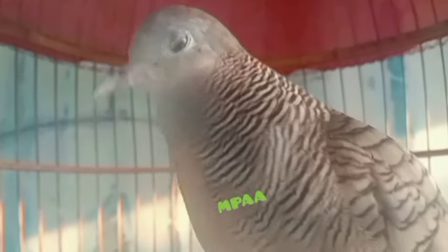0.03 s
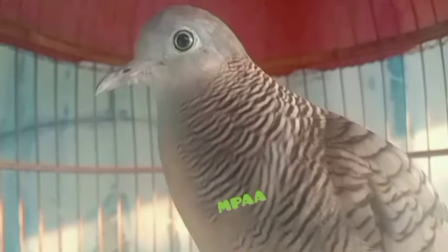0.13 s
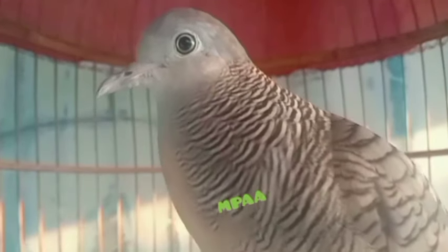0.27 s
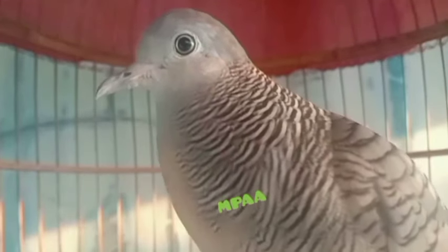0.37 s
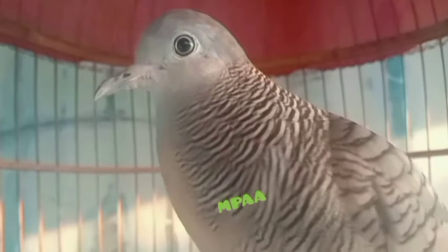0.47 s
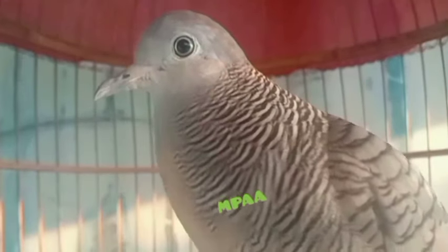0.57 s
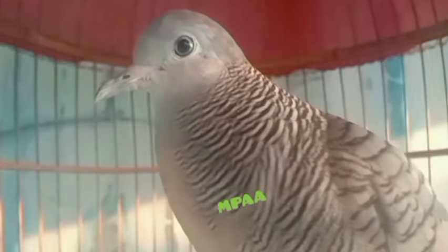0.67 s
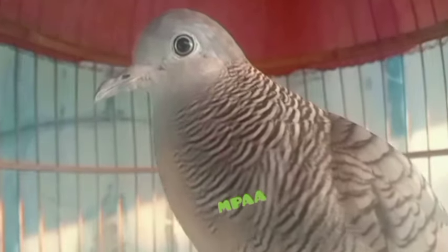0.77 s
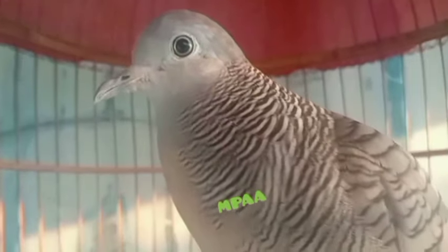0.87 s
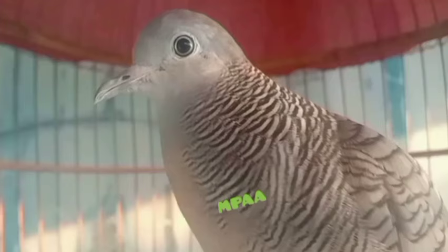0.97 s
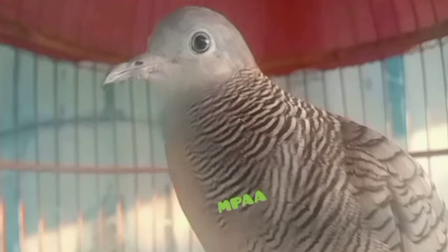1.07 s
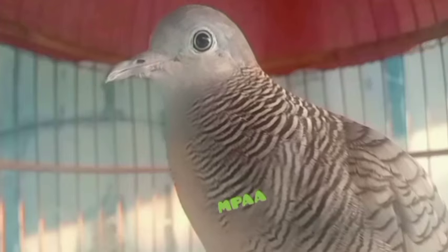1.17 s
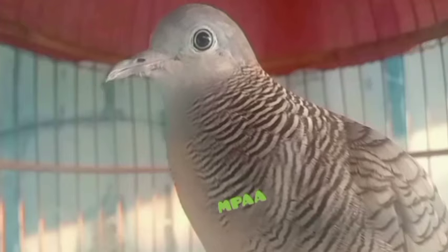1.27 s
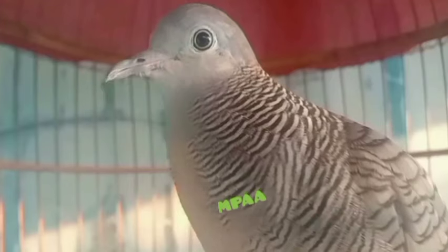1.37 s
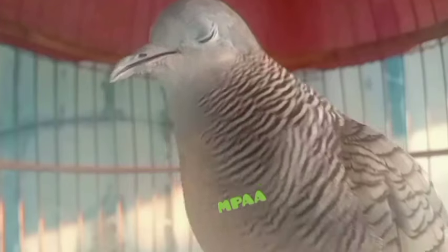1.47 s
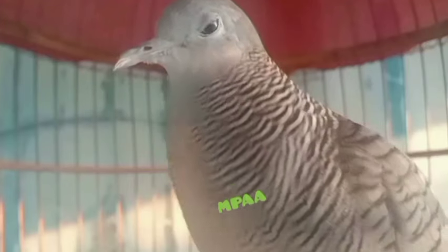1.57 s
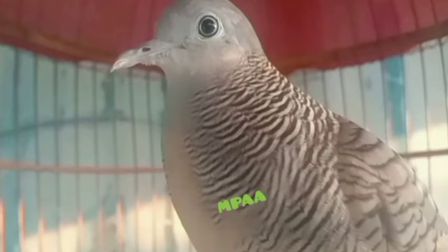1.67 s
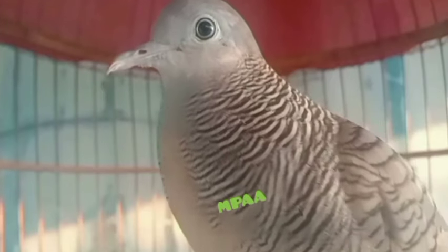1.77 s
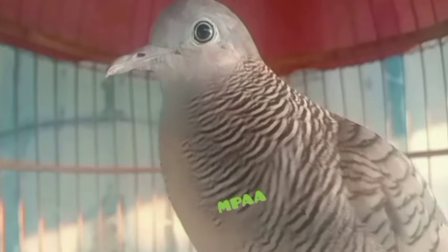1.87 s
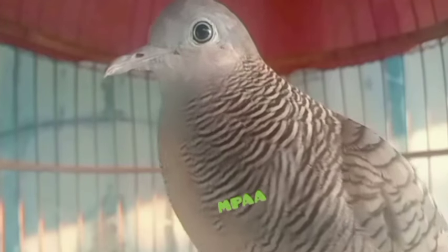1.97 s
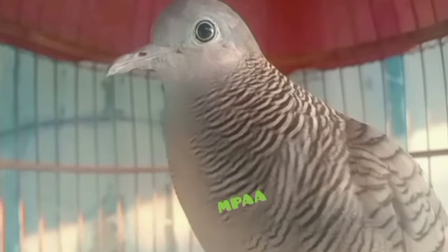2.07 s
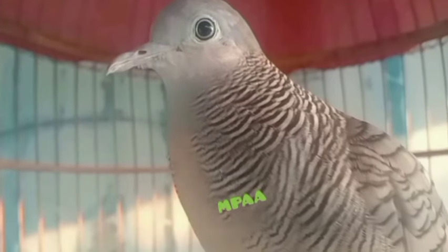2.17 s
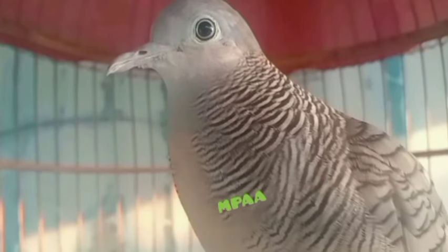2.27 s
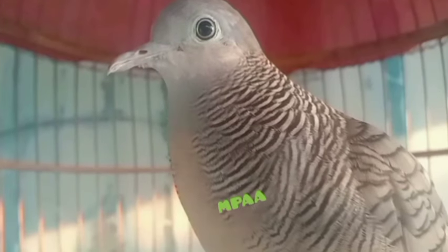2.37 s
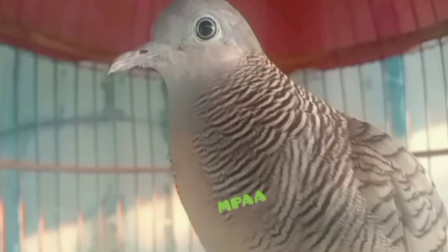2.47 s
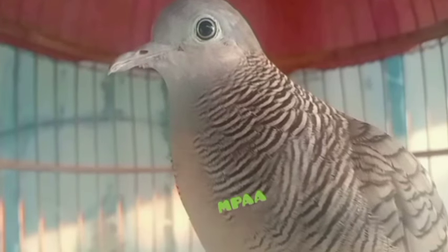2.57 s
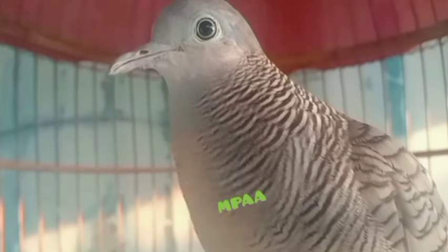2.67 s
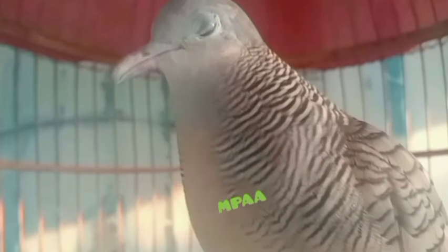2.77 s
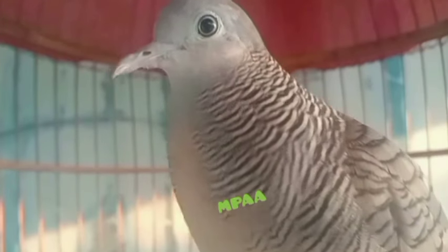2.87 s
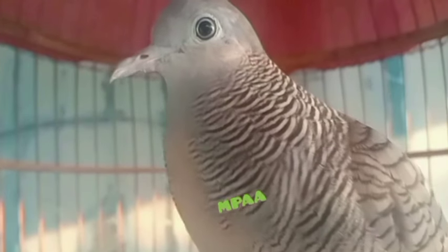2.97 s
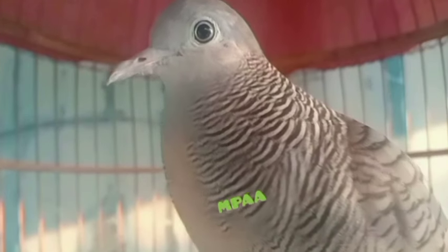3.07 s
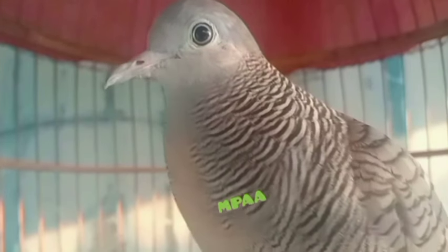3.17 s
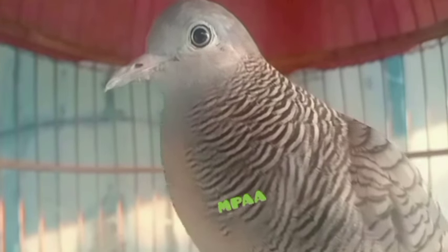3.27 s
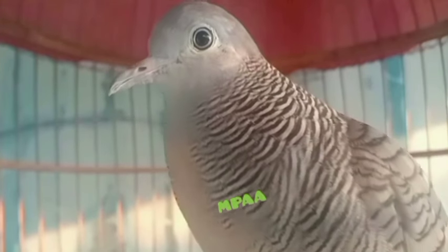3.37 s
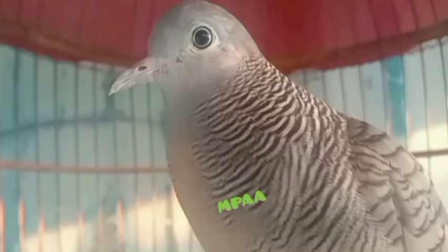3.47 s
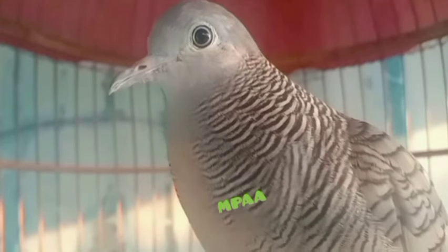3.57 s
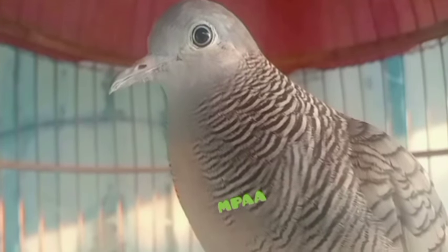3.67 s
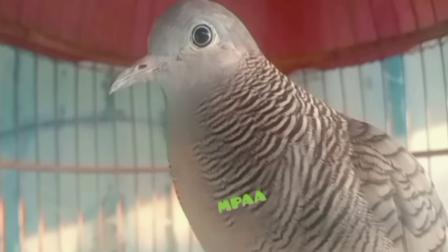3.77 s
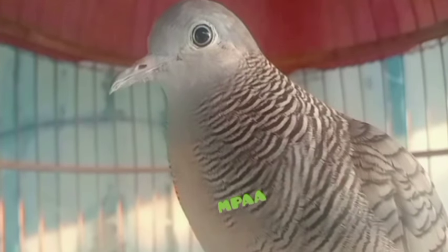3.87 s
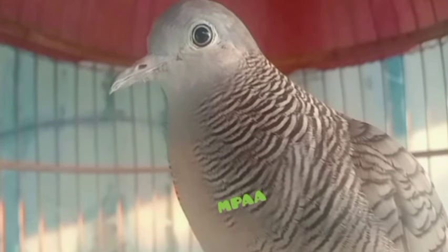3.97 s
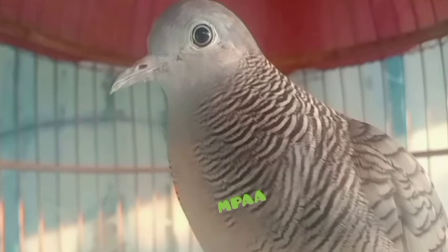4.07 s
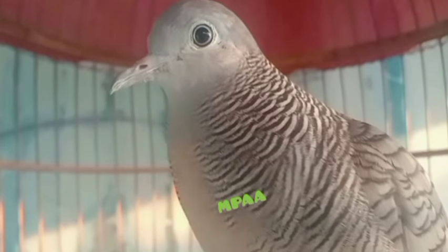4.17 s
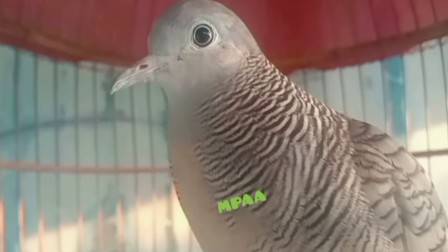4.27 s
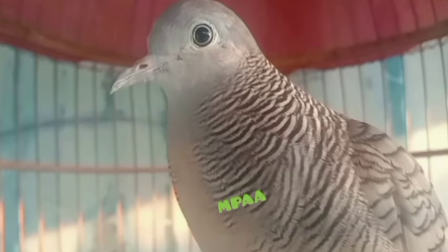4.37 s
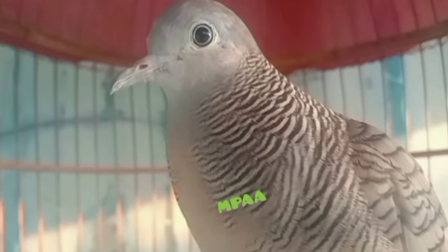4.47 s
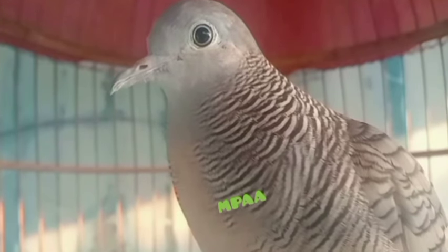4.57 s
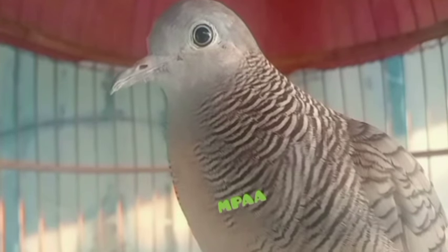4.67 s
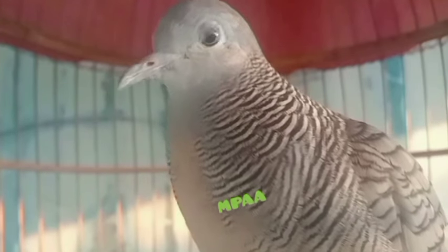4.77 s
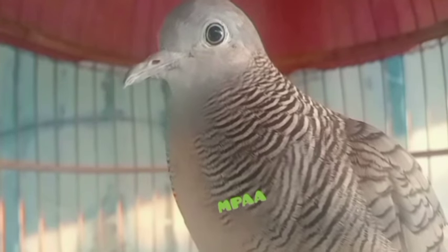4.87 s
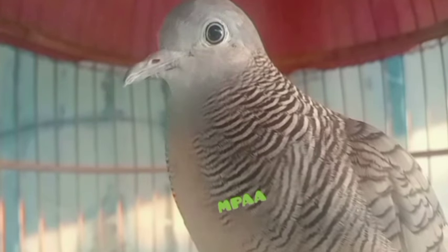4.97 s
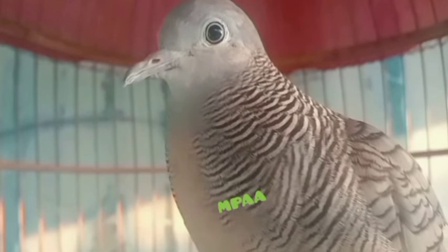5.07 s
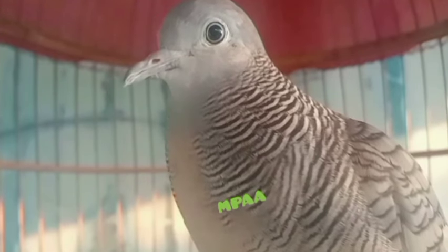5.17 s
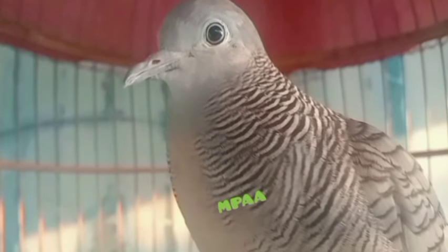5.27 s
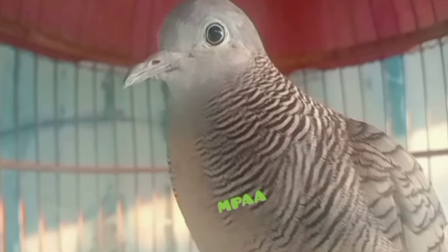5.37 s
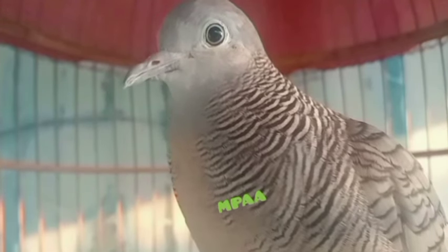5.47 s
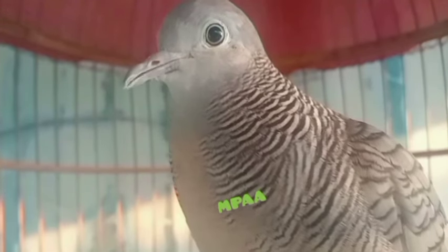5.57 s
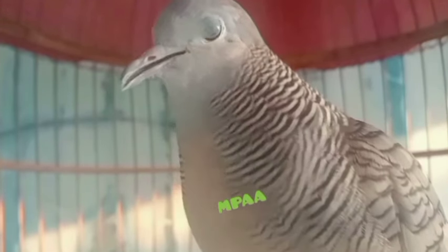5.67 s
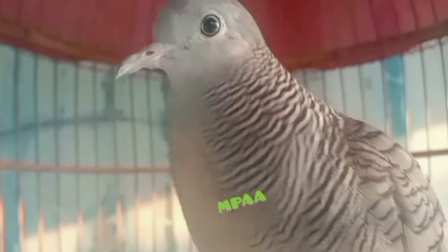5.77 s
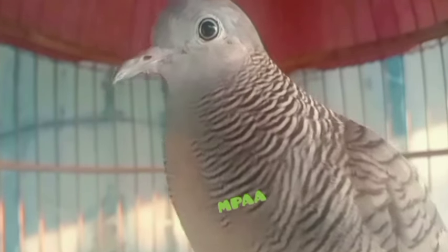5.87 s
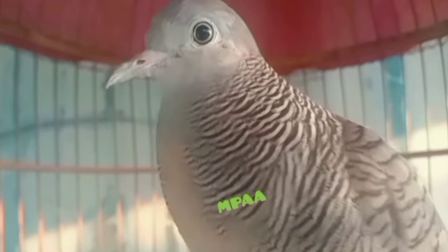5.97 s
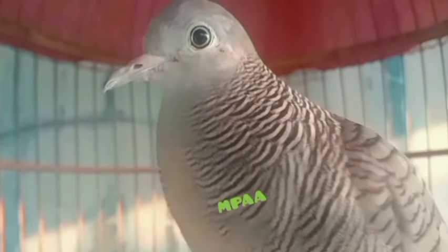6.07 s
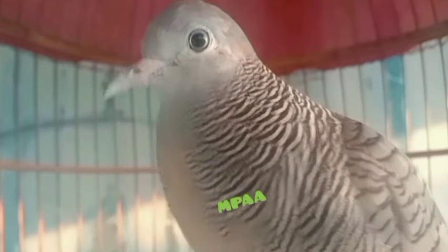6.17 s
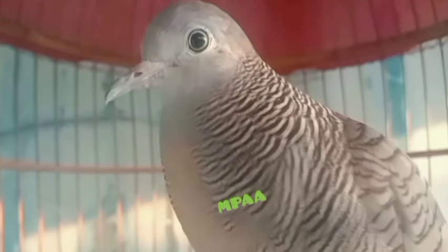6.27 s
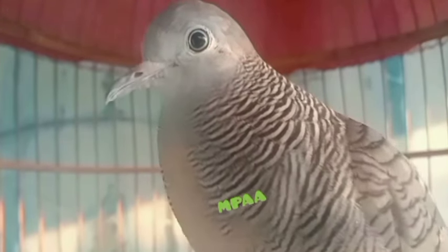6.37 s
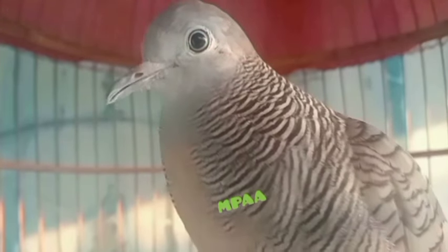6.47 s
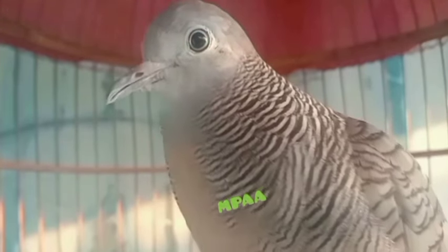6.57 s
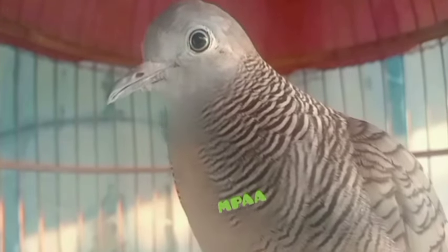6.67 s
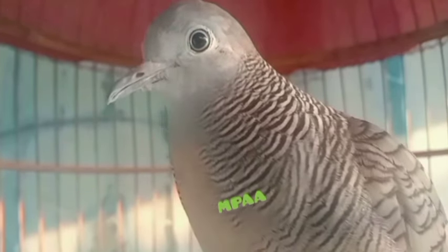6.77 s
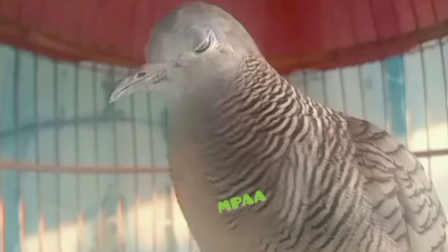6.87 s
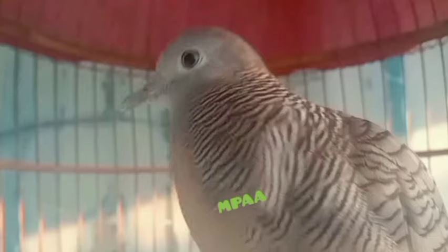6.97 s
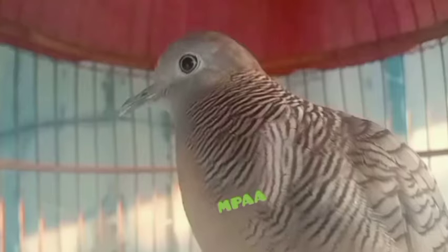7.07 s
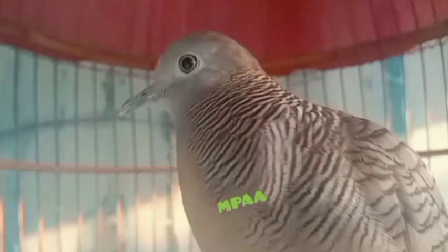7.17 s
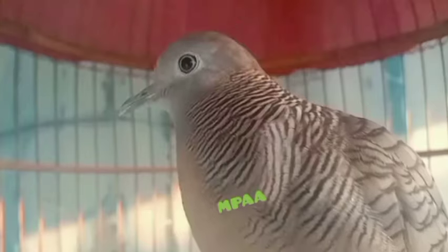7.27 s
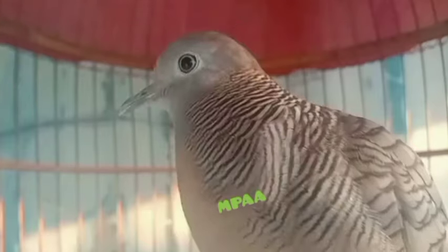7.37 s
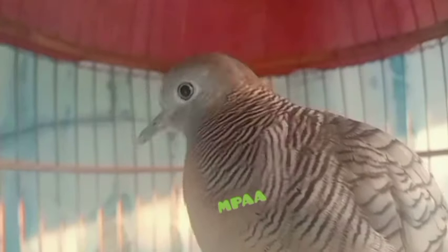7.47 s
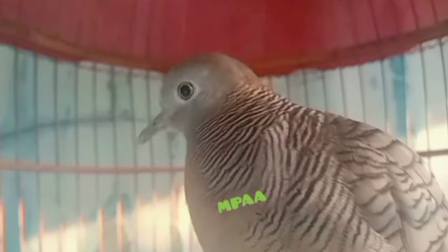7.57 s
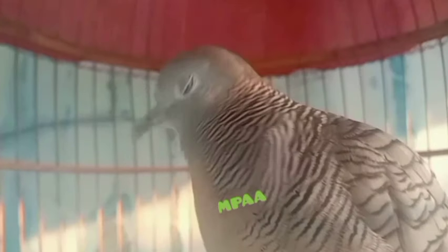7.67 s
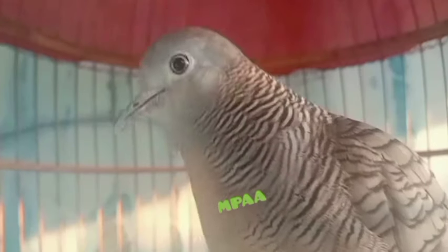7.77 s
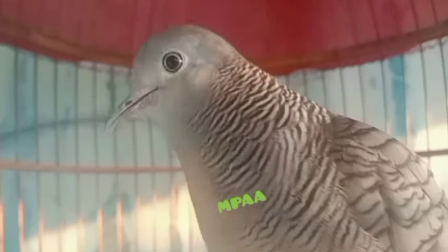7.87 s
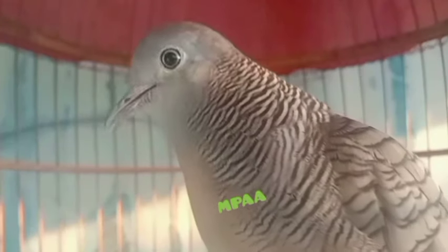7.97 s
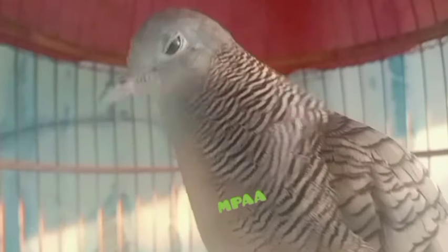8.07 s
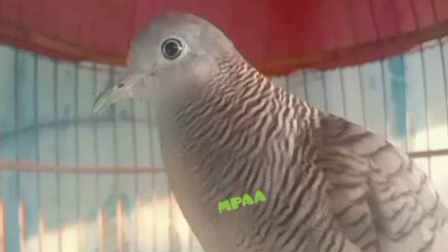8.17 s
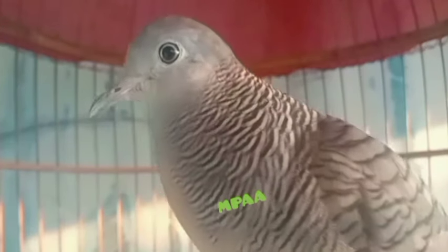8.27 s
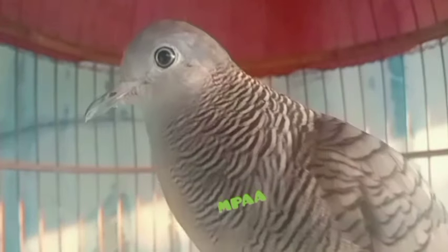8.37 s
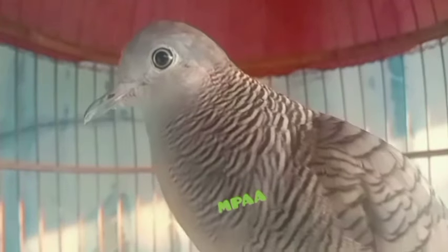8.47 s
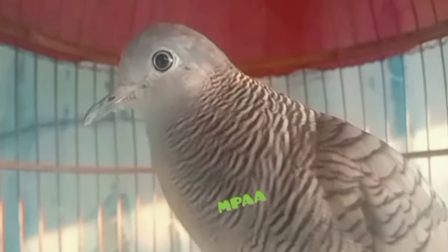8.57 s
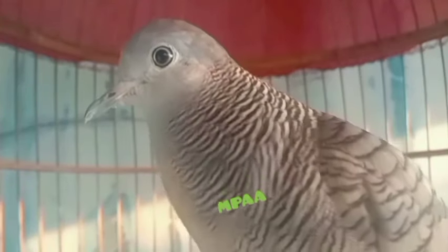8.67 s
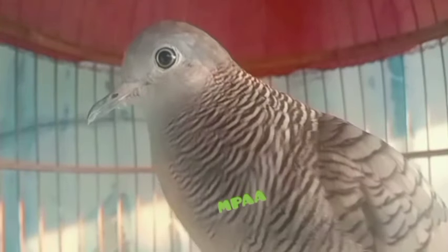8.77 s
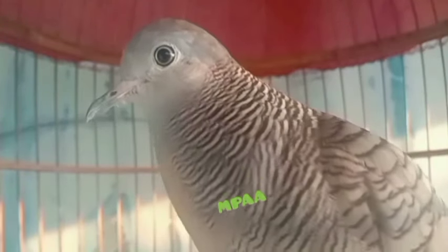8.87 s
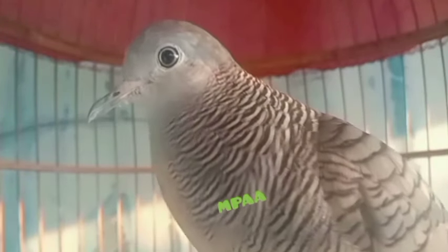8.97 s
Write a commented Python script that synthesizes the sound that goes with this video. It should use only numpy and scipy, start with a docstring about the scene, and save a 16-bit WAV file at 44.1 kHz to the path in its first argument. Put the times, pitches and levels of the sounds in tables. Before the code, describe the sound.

A caged zebra dove coos five loud, rippling phrases close up under a hard echoing roof, with faint far doves and small birds between.

```python
"""Under a hard, echoing roof, a caged zebra dove coos five rippling phrases close to a microphone.
Each coo is a gliding, nearly pure tone with faint overtones; most begin with a creak of quick pops.
Far doves answer in blurred, arched notes; small birds sing fuzzy glides, thin whistles and harsh chirps.
A brief rustle and a quiet outdoor hush are shaped noise. A limiter and a hard ceiling tame the peaks."""
import sys
import numpy as np
from scipy import signal
from scipy.fft import next_fast_len
from scipy.io import wavfile
from scipy.ndimage import uniform_filter1d

SR = 44100
rng = np.random.default_rng(int(sys.argv[2]) if len(sys.argv) > 2 else 0)


def to_wav(s):
    """Save 16-bit WAV."""
    ch = np.atleast_2d(s).T  # columns
    pcm = np.round(np.clip(ch, -1, 1) * 32767)  # PCM
    wavfile.write(sys.argv[1], SR, pcm.astype(np.int16))


N = 398223


def gain_of(db):
    """Turns decibels into a multiplier."""
    return 10 ** (np.asarray(db) / 20)


def evened(x):
    """Scales a sound to an average (RMS) strength of 1."""
    return x / np.sqrt(np.mean(x ** 2) + 1e-20)


def read(points, hz):
    """Reads a frequency curve between its points, on a logarithmic pitch scale."""
    f, value = np.transpose(points)
    return np.interp(np.log(hz + 1), np.log(f + 1), value)


def add(mix, s, sound):
    """Lays a sound into the mix, starting s seconds in."""
    part = mix[max(round(s * SR), 0):][:len(sound)]
    part += sound[:len(part)]


def fade(count, rise, fall):
    """Smooth rise and fall, in seconds."""
    edge = np.arange(count) / SR
    nearest_end = np.minimum(edge / rise, edge[::-1] / fall)
    return np.sin(np.pi / 2 * np.clip(nearest_end, 0, 1)) ** 2


def resonate(x, hz, width):
    """Shifts the pitch hz down to zero, smooths, and shifts back: a resonance of gain 1."""
    turn = np.exp(2j * np.pi * np.cumsum(hz * np.ones(len(x))) / SR)
    r = np.exp(-np.pi * width / SR)
    smooth = signal.lfilter([1 - r], [1, -r], x / turn)
    return 2 * (turn * smooth).real


def noise(colour, patchy_db, count):
    """Builds hiss from random short-time spectra with drifting louder and softer patches."""
    hz = np.fft.rfftfreq(1024, 1 / SR)
    a, b, patches = rng.standard_normal((count // 256 + 5, 513, 3)).T
    patches = uniform_filter1d(patches, size=3, axis=0)  # across frequency
    patches = evened(uniform_filter1d(patches, size=24, axis=1))  # along time
    spectra = (a + 1j * b) * gain_of(read(colour, hz)[:, None] + patchy_db * patches)
    return evened(signal.istft(spectra, nperseg=1024, noverlap=768)[1][:count])


# The close dove's coos, one list a phrase:
# (time [s], length [s], aim pitch [Hz], sag [Hz], level before the mix [dB])
COOS = [
    [(0.0544, 0.1145, 1314, 25, -4.6), (0.1804, 0.0375, 1305, 50, -4), (0.2497, 0.034, 1306, 97, -4),
     (0.332, 0.045, 1340, 135, -5.3), (0.4329, 0.0965, 1316, 115, -3.6), (0.6186, 0.12, 1298, 78, -3.8)],
    [(1.544, 0.124, 1312, 25, -4.6), (1.6817, 0.0346, 1325, 65, -1.8), (1.7462, 0.0292, 1295, 75, -3.6),
     (1.8157, 0.0289, 1318, 90, -3.4), (1.8962, 0.0955, 1296, 92, -3.7)],
    [(2.7825, 0.101, 1308, 15, -4.4), (2.8858, 0.0434, 1325, 60, -4.2), (2.9422, 0.0309, 1300, 65, -4.8),
     (3.004, 0.0325, 1280, 55, -4.1), (3.0847, 0.0319, 1315, 85, -3.3), (3.174, 0.1015, 1303, 125, -4.3)],
    [(5.7281, 0.1415, 1320, 30, -4.3), (5.8711, 0.04, 1305, 45, -3.6), (5.937, 0.0261, 1280, 60, -2.6),
     (6.0099, 0.0315, 1292, 78, -3), (6.0898, 0.0469, 1320, 130, -3.1), (6.2263, 0.1384, 1312, 140, -3.2)],
    [(8.0901, 0.082, 1356, 5, -2.2), (8.1734, 0.0414, 1345, 15, -4.8), (8.2352, 0.0215, 1290, 5, -2.4),
     (8.2872, 0.0257, 1290, 45, -2.1), (8.3572, 0.0306, 1345, 140, -2.8), (8.4382, 0.0952, 1342, 135, -3.9),
     (8.6323, 0.1076, 1366, 145, -4.2), (8.8405, 0.1197, 1362, 138, -4.5)],
]
# How a coo moves, by its place in the phrase:
# (leap [Hz], base rise time [s], last drop [Hz], swell [dB], creak lead [s], creak length [s],
#  creak level before CREAK_DB [dB])
FIRST_COO = (330, .0055, 50, -.5, .02, .019, 6.5)
TIED_COO = (235, .013, 100, 1.5, .012, .012, -60)
LATER_COO = (235, .008, 100, -3.5, .012, .013, 1.5)
# Moments when the pitch of a long first coo slips: (time [s], length [s], depth [Hz])
SLIPS = [(0.115, .032, 75), (1.63, .024, 70), (2.838, .026, 45), (5.82, .026, 35)]
# Moments when the coo sounds louder: (time [s], length [s], extra level [dB])
LOUDER_MOMENTS = [(0.128, .024, 2.5), (5.835, .035, 1.6), (8.195, .02, 1.5), (8.495, .03, 1.6)]
RISE_SHARE, DROP_SHARE = .03, .04  # longer coos rise and drop more slowly (share of the length)
SAG_POWER = 2.3


def dove():
    """Each coo leaps up to its aim, sags slowly and drops as it stops; tied coos have almost no creak."""
    out = np.zeros(N)
    for phrase in COOS:
        manners = [FIRST_COO, TIED_COO] + [LATER_COO] * len(phrase)
        for (s, length, aim_hz, sag_hz, db), manner in zip(phrase, manners):
            leap_hz, rise, drop_hz, swell_db, lead, creak_s, creak_db = manner
            t = np.arange(-.003, length + .003, 1 / SR)
            hz = aim_hz - leap_hz * np.exp(-t / (rise + RISE_SHARE * length))
            hz -= sag_hz * np.abs(t / length) ** SAG_POWER
            hz -= drop_hz * np.exp((t - length) / (.003 + DROP_SHARE * length))
            for at, span, depth_hz in SLIPS:
                progress = np.clip((s + t - at) / span, 0, 1)
                hz -= depth_hz * np.sin(np.pi * progress ** .7)
            level_db = db + swell_db * (t / length - .5)
            for at, span, extra_db in LOUDER_MOMENTS:
                progress = np.clip((s + t - at) / span, 0, 1)
                level_db += extra_db * np.sin(np.pi * progress) ** 2
            add(out, s + t[0], voice(hz, level_db))
            add(out, s - lead, creak(creak_s, creak_db))
    return out + clucks()


# Base level of the second to twelfth partial, beside the main tone: (level [dB])
OVERTONES = [-29.5, -37.5, -38.5, -44.5, -41.5, -50, -58, -55, -60.5, -58, -69]
# How the throat colours the overtones: (frequency [Hz], level [dB])
THROAT = [(2000, 2.5), (2500, -2.5), (3300, -6), (5000, -0.5), (6000, -2.5), (7600, 2), (9000, -2),
          (15000, -6)]
TONE_RISE_S, TONE_FALL_S, LEAK_RISE_S, LEAK_FALL_S = .007, .006, .021, .008
GLIDE_LOSS_DB = .0009  # overtones from the third partial up weaken while the pitch moves (dB per Hz/s)


def voice(hz, db):
    """The inflated throat passes a near sine; weak, unsteady overtones leak through more slowly."""
    turns = 2 * np.pi * (np.cumsum(hz) / SR + rng.random())
    t = np.arange(len(hz)) / SR
    waver = np.sin(t * rng.uniform(56, 160, (11, 1)) + 2 * np.pi * rng.random((11, 1)))
    loss_db = GLIDE_LOSS_DB * uniform_filter1d(np.abs(np.gradient(hz)) * SR, size=200)
    weak = np.zeros(len(hz))
    for k, base_db in enumerate(OVERTONES):
        partial = k + 2
        partial_db = base_db + read(THROAT, partial * hz) + 8.0 * waver[k] - (k > 0) * loss_db
        weak += gain_of(partial_db) * np.sin(partial * turns)
    tone = np.sin(turns) * fade(len(hz), TONE_RISE_S, TONE_FALL_S)
    leak = weak * fade(len(hz), LEAK_RISE_S, LEAK_FALL_S) ** 2
    return gain_of(db) * (tone + leak)


# How the throat rings under each pop: (frequency [Hz], level before the creak's own level [dB])
CREAK_RING = [(690, -16), (980, -4.5), (1500, -7)]
CREAK_DB, CREAK_HZ = -19, 300  # base level; pops per second at the start, half as many again at the end


def creak(length, db):
    """Before the tone locks in, the membranes pop a few times, generally louder and louder."""
    t = np.arange(0, length, 1 / SR)
    turns = np.cumsum(CREAK_HZ * (1 + .5 * t / length)) / SR + rng.random()
    starts = np.diff(turns // 1, prepend=0) > 0  # one pop at each whole turn
    pops = starts * gain_of(-17 * (1 - t / length) ** 4 + 2.6 * rng.standard_normal(len(t)))
    ring = sum(gain_of(d) * np.sin(2 * np.pi * f * t[:190]) for f, d in CREAK_RING)
    return gain_of(db + CREAK_DB) * np.convolve(pops, ring * np.hanning(190))


# A small cluck before each phrase: (time [s], starting level before its fade-in and the mix [dB])
CLUCKS = [(0.01, -26), (1.493, -16.5), (2.735, -22.5), (5.688, -20.5), (8.034, -22)]


def clucks():
    """Each cluck is a 1050 Hz tone that starts quickly and dies away."""
    out = np.zeros(N)
    t = np.arange(SR // 20) / SR
    tone = np.sin(2 * np.pi * 1050 * t) * np.minimum(t / 0.0036, 1)
    for s, db in CLUCKS:
        add(out, s, gain_of(db - 60 * t / 0.042) * tone)
    return out


# Echoes from roof, walls and floor: (delay [ms], gain before dulling [multiplier])
ECHOES = [(1.77, 0.24), (7.12, 0.46), (9.07, 0.29), (9.3, 0.22), (11.79, 0.123), (12.83, 0.092),
          (15.51, 0.055), (19.46, 0.214), (20.05, 0.028), (25.12, 0.15), (29.75, 0.12), (32.79, 0.22),
          (35.06, 0.16), (37.64, 0.078), (41.04, 0.063), (46.89, 0.15), (57.14, 0.024), (69.89, 0.093)]
ECHO_DULL_HZ = 5200


def shelter(x):
    """Adds single dull echoes from hard faces near the cage, strongest around the pitch of the coo."""
    taps = np.zeros(SR // 10)
    for ms, gain in ECHOES:
        taps[round(ms * SR / 1000)] += gain
    echoes = signal.fftconvolve(x, taps)[:N]
    echoes = signal.filtfilt(*signal.butter(2, ECHO_DULL_HZ, fs=SR), echoes)
    b, a = signal.butter(2, [820, 1480], "bandstop", fs=SR)
    off_pitch = signal.filtfilt(b, a, echoes)
    return x + echoes - .6 * off_pitch


# How long the late echo takes to fall by 60 dB: (frequency [Hz], time [s])
YARD = [(300, .4), (1200, 0.47), (3000, 0.31), (8000, 0.3)]


def yard(x):
    """Late echo: random taps, each frequency band dying at its own speed."""
    hz, t, z = signal.stft(rng.standard_normal(SR), SR, nperseg=256)
    dying = z * gain_of(-60 * t / read(YARD, hz)[:, None])
    tail = signal.istft(dying, SR, nperseg=256)[1]
    return signal.fftconvolve(x, tail / np.linalg.norm(tail))[:N]


# Far doves, one list an answer: (time [s], level before end fades [dB], pitch before note variation [Hz])
FAR_DOVES = [
    [(0.95, -66.5, 1150), (1.17, -60, 1050), (1.22, -44, 1060), (1.36, -37, 1200), (1.52, -38.5, 1150)],
    [(2.0, -33, 1150), (2.5, -43, 1170), (2.73, -47, 1220)],
    [(3.36, -46.5, 1240), (3.678, -68.5, 854), (3.8, -75, 1050)],
    [(5.05, -72, 1218), (5.36, -52, 1100), (5.71, -44, 1020)],
    [(6.4, -34, 1150), (6.7, -40, 1060), (7.038, -44, 1040), (7.3, -70, 1020)],
]


def far_doves():
    """Three birds sing arched notes of changing pitch, blurred by distance into a wavering band."""
    out = np.zeros(N)
    for rows in FAR_DOVES:
        s, db, hz = np.transpose(rows)
        t = np.arange(s[0], s[-1], 1 / SR)
        # 15 notes a second per bird, the birds out of step
        beat, note = np.modf((t - s[0]) * 15 + np.array([[0], [.3], [.6]]))
        pitch = rng.uniform(.84, 1.13, (40, 3))[note.astype(int), [[0], [1], [2]]]
        arch = 1.08 - .22 * np.exp(-beat / .2) - .16 * beat ** 2
        note_hz = np.interp(t, s, hz) * pitch * arch
        notes = np.sin(2 * np.pi * np.cumsum(note_hz, axis=1) / SR)
        notes *= np.sin(np.pi * np.minimum(beat / 0.88, 1))
        slow = signal.butter(4, 35, fs=SR, output="sos")
        flutter = signal.sosfiltfilt(slow, rng.standard_normal(len(t)))
        notes = notes.sum(axis=0) * (1 + .6 * evened(flutter))
        # play twice and keep the second pass, so the echo is already ringing at its start
        echo = yard(np.r_[notes, notes])[len(t):2 * len(t)]
        blurred = evened(evened(echo) + .4 * evened(notes))
        add(out, s[0], gain_of(np.interp(t, s, db)) * blurred * signal.windows.tukey(len(t), .1))
    return out


def far_birds():
    """Glides, whistles and harsh chirps, each heard with a softer late echo from the yard."""
    birds = glides() + whistles() + chirps()
    return birds + gain_of(-7) * yard(birds)


# Far bird tones: (time [s], length [s], from [Hz], to [Hz], level before fades and echo [dB], blur [Hz])
TONES = [(1.195, .05, 2280, 2400, -58, 40), (1.285, .07, 2340, 2490, -59, 40),
         (1.22, .1, 1340, 1400, -45, 30), (2.37, .1, 1290, 1290, -42, 20),
         (1.228, 0.0579, 1968, 1963, -57, 20), (0.87, .17, 890, 880, -59, 40),
         (2.2, .3, 1620, 1610, -62, 50), (2.27, .14, 1000, 1030, -42, 90),
         (2.47, 0.07, 850, 824.5, -55, 60), (2.59, .17, 4560, 4350, -54, 200),
         (2.44, .06, 3150, 3250, -63, 40), (2.655, .045, 2850, 2870, -57, 40),
         (2.54, 0.08, 3700, 4600, -50, 60), (2.546, 0.083, 3189, 3037, -54.5, 50),
         (2.564, 0.09, 3651, 3500, -54, 40), (2.57, 0.12, 1979, 1994, -56, 80),
         (2.58, 0.1278, 2590, 2488, -60, 50), (2.698, 0.09051, 3015, 3268, -50.5, 40),
         (2.75, .09, 330, 290, -49, 18), (2.86, .17, 320, 342, -47, 18), (2.998, 0.2, 396, 415, -50, 20),
         (3.3, 0.34097, 755, 770, -54.5, 40), (3.585, .06, 617, 610, -57, 10),
         (3.82, .05, 3600, 4300, -66, 500), (4.172, 0.09, 3600, 4400, -55, 70),
         (4.26, .13, 4400, 4350, -64, 60), (4.2, 0.38, 2010, 2030, -69, 80),
         (4.3, .26, 2200, 2720, -69, 120), (5.38, .32, 2780, 2790, -66, 30),
         (5.3, .38, 2000, 1950, -68, 80), (6.47, 0.04857, 614, 625, -45, 10),
         (6.652, 0.18, 3850, 3660, -52.5, 80), (6.655, 0.07, 610, 625, -48, 10),
         (6.875, .06, 570, 560, -52, 20), (6.87, .05, 727, 686.8, -51, 120),
         (7.325, 0.04, 1620, 1634, -54, 40), (7.31, .05, 1974, 2150, -57, 60),
         (7.5, 0.18, 430, 417, -59, 25), (7.82, 0.1, 320, 290, -60, 25), (7.77, .08, 880, 870, -62, 30),
         (8.72, .24, 400, 420, -53, 30), (7.96, .08, 930, 1080, -43, 90), (7.99, .1, 1290, 1400, -40, 60),
         (8.03, .06, 1000, 1050, -40, 120), (7.75, .06, 1560, 1580, -62, 60),
         (8.55, .08, 1380, 1420, -36, 60), (6.05, .06, 650, 640, -50, 40), (6.17, .05, 600, 610, -52, 40)]


def glides():
    """Noise rings in two narrow resonances that follow a gliding pitch."""
    out = np.zeros(N)
    for s, length, from_hz, to_hz, db, blur_hz in TONES:
        u = np.linspace(0, 1, round(length * SR))
        hz = from_hz + (to_hz - from_hz) * np.sin(u * np.pi / 2)
        fuzzy = resonate(rng.standard_normal(len(u)), hz, blur_hz)
        fuzzy = resonate(fuzzy, hz, 2 * blur_hz)
        add(out, s, gain_of(db) * evened(fuzzy) * signal.windows.tukey(len(u), .4))
    return out


# Thin whistles: (time [s], length [s], pitch before drift [Hz], level before flutter, fades and echo [dB],
#  octave below, beside the main tone [dB])
WHISTLES = [(0, 0.036, 4900, -50, -11.5), (2.245, 0.13, 4781, -53, -8), (2.945, 0.17, 4920, -49, -13),
            (4.91, 0.085, 4790, -53, -32), (5.26, 0.177, 4790, -59, -4), (5.995, 0.1, 4930, -46, -9.5),
            (6.315, 0.15, 4830, -41, -15), (8.38, 0.05, 5000, -57, -4)]


def whistles():
    """A slightly drifting, fluttering tone with a weaker one an octave below."""
    out = np.zeros(N)
    for s, length, hz, db, low_db in WHISTLES:
        drift = 1 + 0.011 * np.cos(np.linspace(0, 2.6, round(length * SR)) + rng.random())
        low_turns = np.pi * hz * np.cumsum(drift) / SR
        flutter = uniform_filter1d(rng.standard_normal(len(low_turns)), size=500)
        tone = np.sin(2 * low_turns) + gain_of(low_db) * np.sin(low_turns)
        tone *= 1 + .4 * evened(flutter)
        add(out, s, gain_of(db) * tone * signal.windows.tukey(len(tone), .45))
    return out


# Harsh chirps of a small bird: (time [s], length [s], level before the bands, fades and echo [dB])
CHIRPS = [(0.309, 0.01919, -48), (0.373, 0.06747, -55), (3.545, 0.04628, -58), (3.658, 0.03678, -47.5)]
# Bands in every chirp: (frequency [Hz], width of each of two passes [Hz], level beside the chirp's [dB])
CHIRP_BANDS = [(3300, 500, -2), (4900, 300, -2), (5600, 500, 1), (6700, 400, -9)]


def chirps():
    """One burst of hiss rings in several bands at once."""
    out = np.zeros(N)
    for s, length, db in CHIRPS:
        hiss = rng.standard_normal(round(length * SR))
        harsh = np.zeros(len(hiss))
        for hz, width, band_db in CHIRP_BANDS:
            band = resonate(resonate(hiss, hz, width), hz, width)
            harsh += gain_of(band_db) * evened(band)
        add(out, s, gain_of(db) * harsh * signal.windows.tukey(len(hiss), .3))
    return out


# Something brushes the cage: (time [s], time to fall by 60 dB [s], starting level before fades [dB])
RUSTLE = (7.755, 0.547, -47.5)
# Its tone colour: (frequency [Hz], relative level per Hz [dB])
RUSTLE_COLOUR = [(500, -12.5), (1500, -8.5), (5000, -10), (15000, -5)]


def rustle():
    """A short wide hiss that dies away."""
    s, t60, db = RUSTLE
    out = np.zeros(N)
    t = np.arange(SR // 5) / SR
    ends = np.clip(t / 0.008, 0, 1) * np.clip((.13 - t) / 0.05, 0, 1)
    hiss = noise(RUSTLE_COLOUR, 2.8, count=len(t))
    add(out, s, gain_of(db - 60 * t / t60) * ends * hiss)
    return out


# Tone colour of the hush: (frequency [Hz], relative level per Hz [dB])
HUSH_COLOUR = [(25, -40), (50, -24), (75, 3), (110, 0), (170, -5.5), (200, -5), (260, -11), (370, -6),
               (600, -18), (1200, -15), (2500, -29), (4200, -33), (6000, -30), (7900, -21.5),
               (11000, -33.5), (15500, -42.5)]
# Loudness of the hush: (time [s], level [dB])
HUSH_DB = [(0.0, -56), (1.3, -57.5), (3.4, -59.5), (4.65, -63.5), (5.2, -59.5), (7.12, -57.5), (7.27, -65),
           (7.9, -63), (8.3, -57), (9.03, -53.5)]


def hush():
    """Distant traffic and air: a lumpy low wash."""
    s, db = np.transpose(HUSH_DB)
    level_db = np.interp(np.arange(N) / SR, s, db)
    return gain_of(level_db) * noise(HUSH_COLOUR, 4.8, count=N)


def scene():
    """Mixes the close dove and its echoes with the far birds, rustle and hush."""
    no_bass = signal.butter(3, 520, "high", fs=SR, output="sos")
    bird = signal.sosfilt(no_bass, gain_of(-.7) * dove())
    late = yard(np.r_[np.zeros(SR // 25), bird])  # starts 40 ms after the bird
    close = shelter(bird) + gain_of(-23) * late
    return (close + far_doves() + far_birds() + rustle() + hush())[None]


MIC_LOW_HZ, EDGE_HZ = 58, 15700  # bass cut, treble limit
CEILING = 1.01  # before the final gain of .97


def record(dry):
    """A small microphone with little deep bass, a quick limiter, a hard ceiling, a bass cut and a band limit."""
    low_cut = signal.butter(2, MIC_LOW_HZ, "high", fs=SR, output="sos")
    thin = signal.sosfilt(low_cut, dry)
    swing = np.abs(signal.hilbert(thin, next_fast_len(N)))[:, :N]
    limited = thin / np.maximum(swing, 1) ** .72
    clipped = .97 * np.clip(limited, -CEILING, CEILING)
    band_limit = signal.firwin(1023, EDGE_HZ, window=("kaiser", 9), fs=SR)
    return signal.oaconvolve(signal.sosfilt(low_cut, clipped), band_limit[None], "same")


dry = scene()
out = record(dry)
to_wav(out)
```